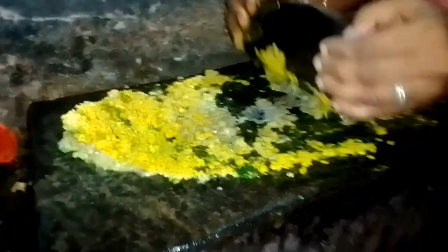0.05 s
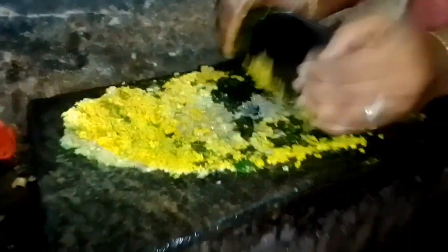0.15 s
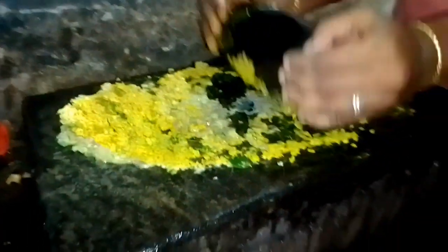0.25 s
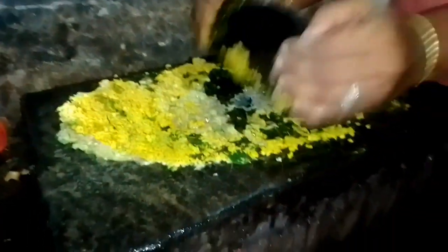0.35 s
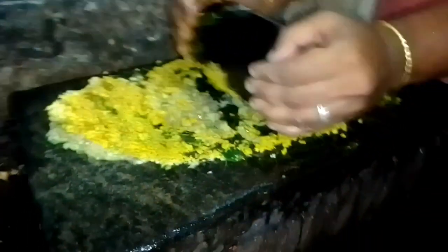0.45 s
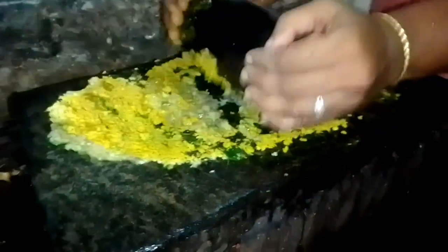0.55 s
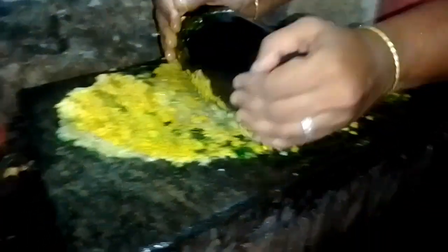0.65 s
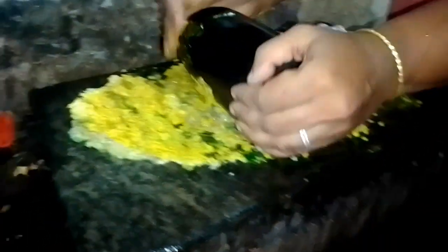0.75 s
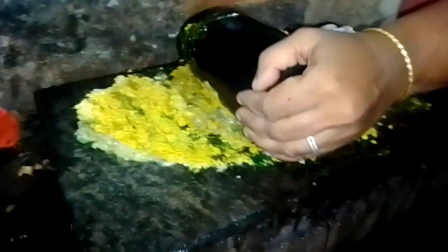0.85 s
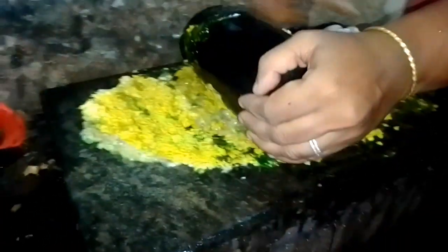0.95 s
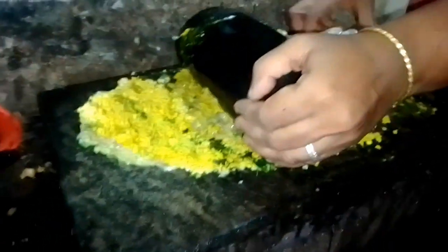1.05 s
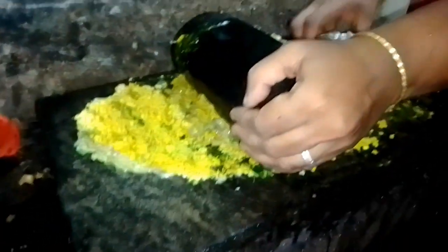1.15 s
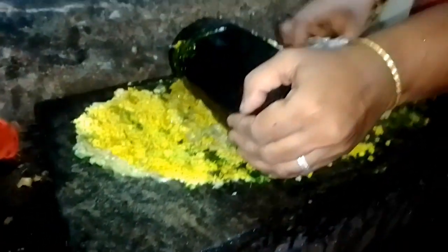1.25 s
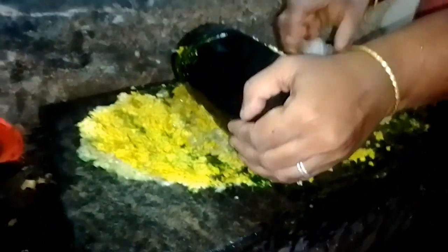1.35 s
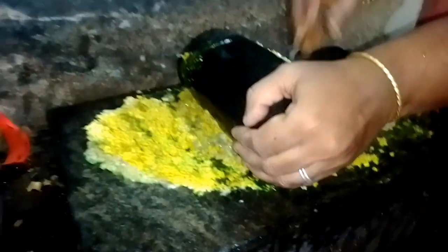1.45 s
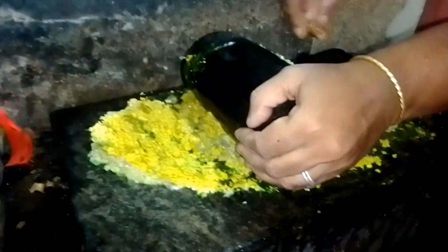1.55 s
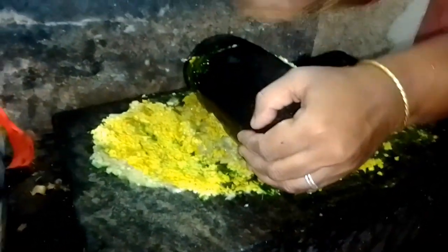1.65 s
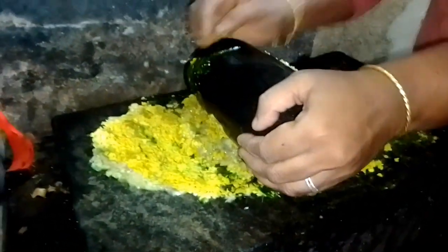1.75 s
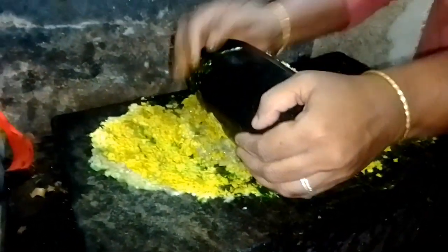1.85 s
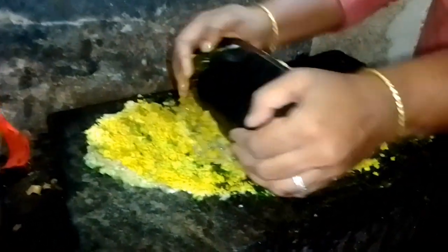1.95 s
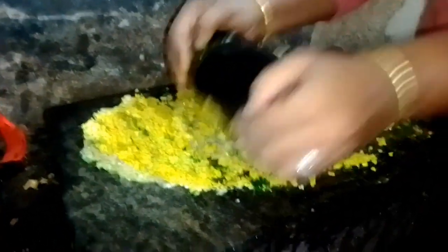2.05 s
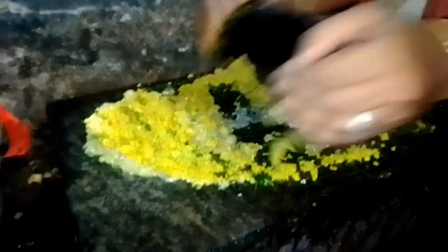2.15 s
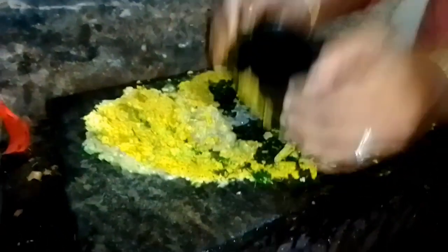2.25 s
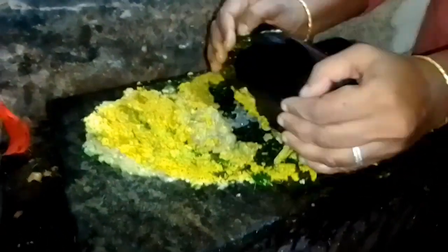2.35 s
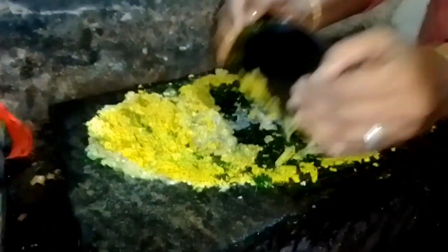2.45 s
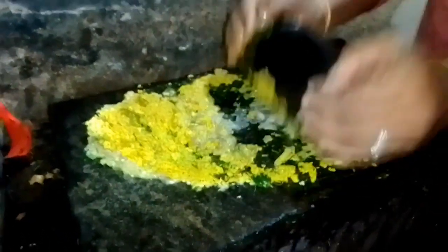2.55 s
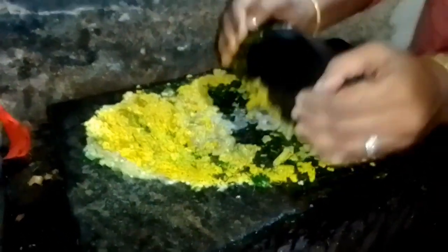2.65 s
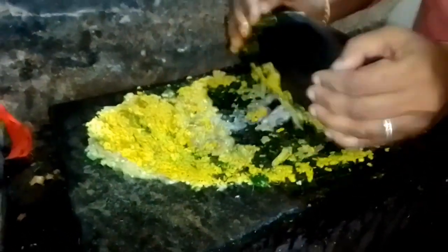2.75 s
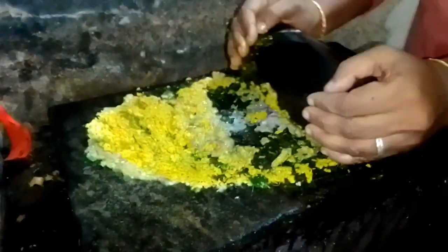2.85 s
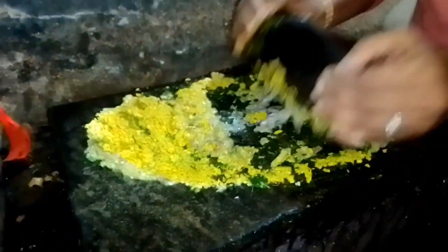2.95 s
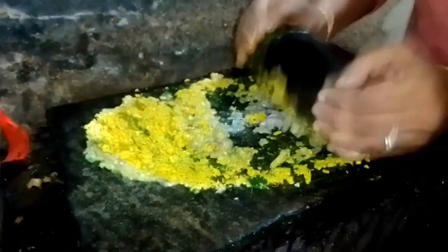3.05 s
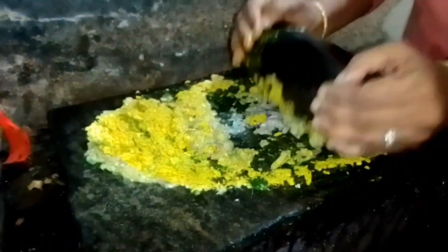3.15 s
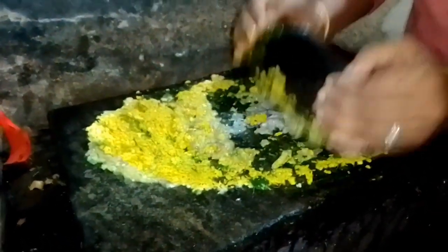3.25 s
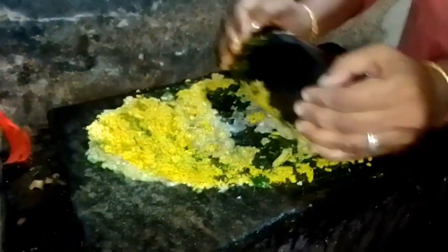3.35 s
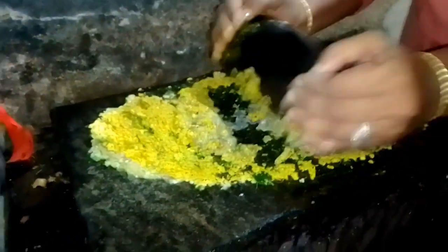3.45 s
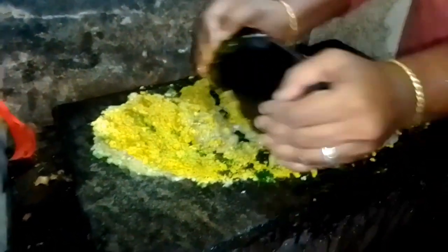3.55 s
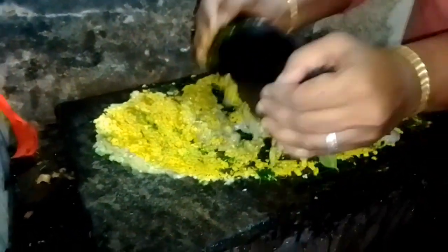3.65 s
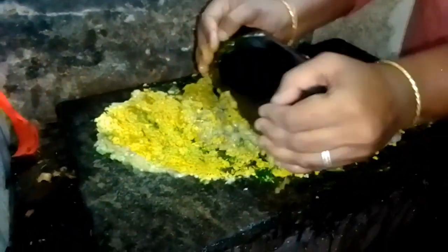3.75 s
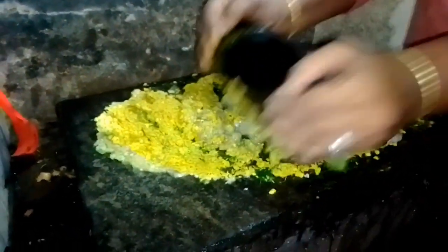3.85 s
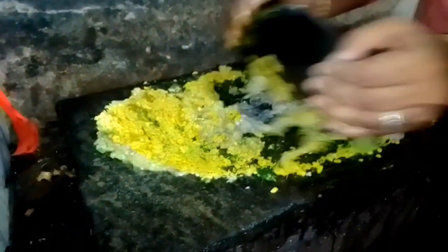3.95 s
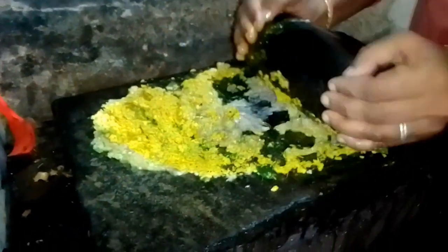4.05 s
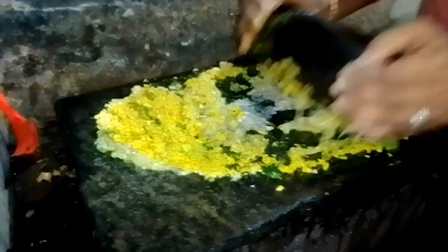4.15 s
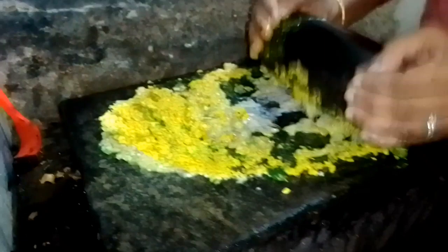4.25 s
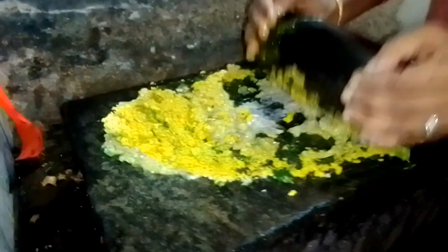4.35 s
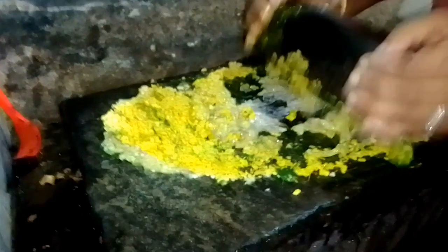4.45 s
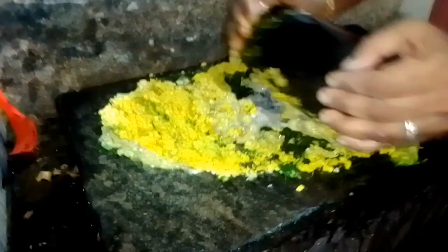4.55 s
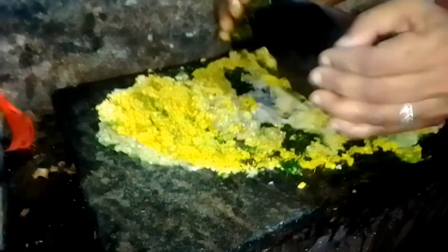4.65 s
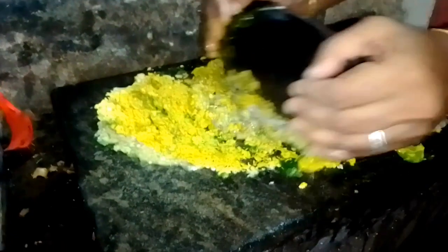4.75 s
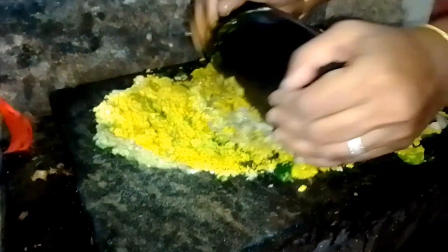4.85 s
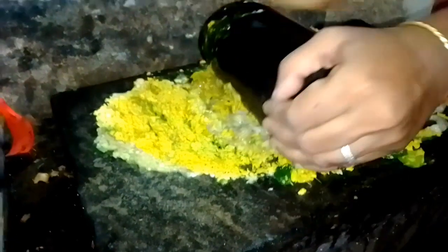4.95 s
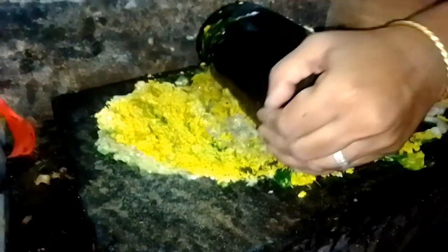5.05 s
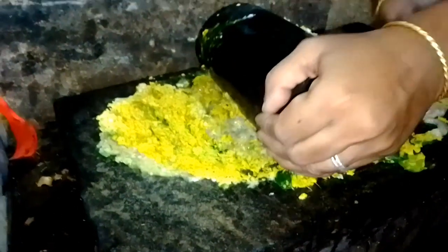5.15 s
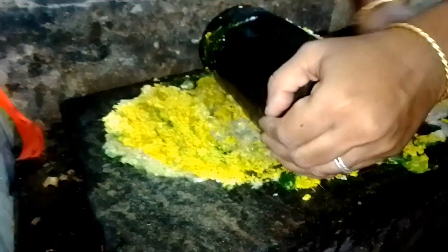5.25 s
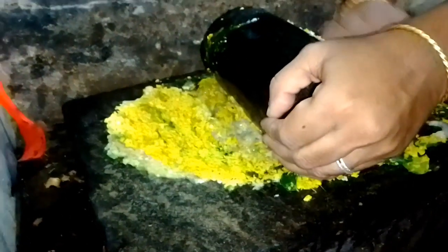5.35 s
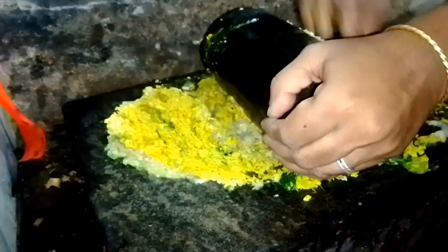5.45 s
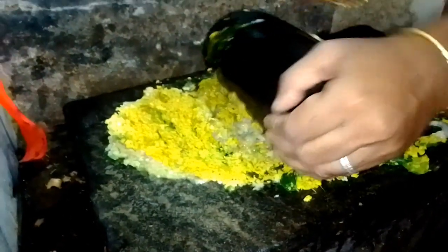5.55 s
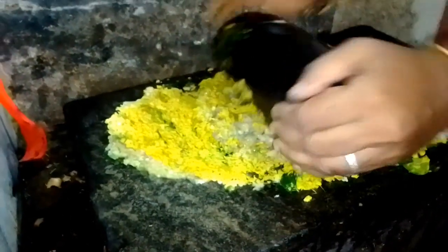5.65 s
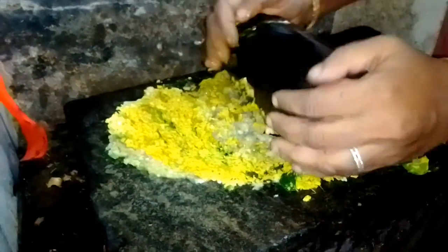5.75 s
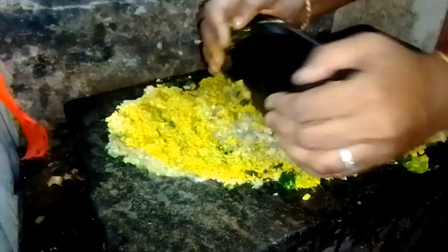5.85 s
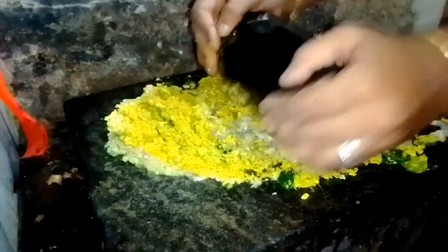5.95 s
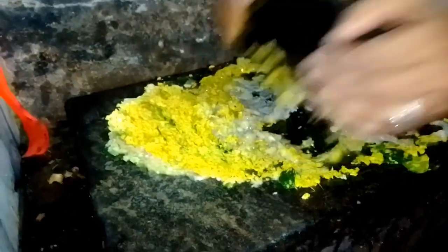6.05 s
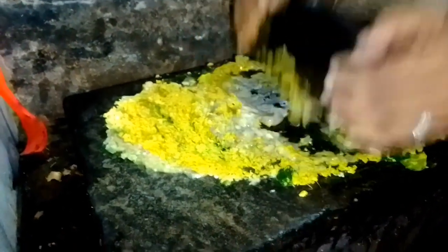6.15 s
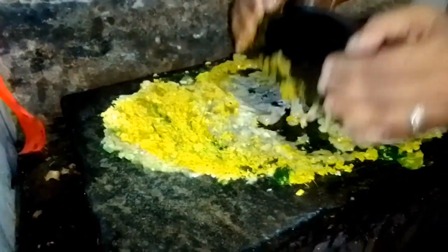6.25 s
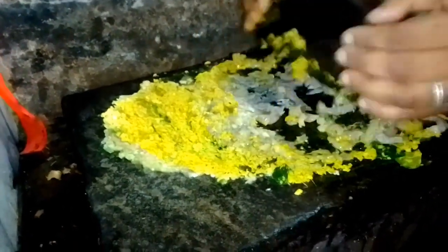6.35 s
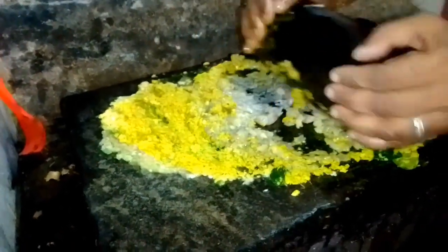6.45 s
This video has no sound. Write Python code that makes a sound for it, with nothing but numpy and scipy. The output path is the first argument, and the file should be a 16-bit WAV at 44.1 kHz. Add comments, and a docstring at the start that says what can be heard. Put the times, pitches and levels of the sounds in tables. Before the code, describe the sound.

Close up in a small hard-walled kitchen, a stone roller works wet, grainy paste on a flat slab. Soft smacks and thin squeaks come first, then quiet gritty rubbing, then a quick run of wet smacks with squeals and a low groan. A sharp stone knock rings briefly near the end, followed by faint crackle. A faint hum and hiss stay behind.

```python
"""Wet spice paste smacks and squeaks under a stone roller worked by hand on a flat grinding stone in a small kitchen.
Smacks, pops and crunches are bursts of tiny clicks passed through filters; squeaks and groans are unsteady tones.
Grains crackle as filtered clicks and the slab rumbles as low noise, both following the weight on the roller.
Once stone knocks hard on stone: a few filtered blows and many fading tones.
Hard walls answer the paste and the knock's thud; a faint hum and hiss lie behind."""
import sys
import numpy as np
from scipy import signal
from scipy.fft import rfft, irfft
from scipy.io import wavfile

SR = 44100
rng = np.random.default_rng(int(sys.argv[2]) if len(sys.argv) > 2 else 0)


def inscribe(sig):
    """Save sig as 16-bit PCM at rate SR to the path in sys.argv[1].

    A 1-D sig is mono; a 2-D sig holds one channel per row.
    Samples are clipped to [-1, 1] before scaling.
    """
    pcm = np.round(np.clip(np.atleast_2d(sig).T, -1, 1) * 32767)
    wavfile.write(sys.argv[1], SR, pcm.astype(np.int16))


N = 286209
TIME = np.arange(N) / SR  # seconds

# Wet smacks of the paste: (time [s], strength [dB], air pocket's snap against strength [dB],
# fizz against strength [dB], air pocket's pitch [Hz])
SMACK_EVENTS = [(0.3314, -53, 9.5, -7, 1990), (0.56, -53.5, 11, -13.5, 1830), (2.452, -51.5, 1, -18, 2025),
                (2.702, -48.5, -1, -20, 1530), (2.946, -47, 2, -19, 2140), (3.196, -47.5, 6, -16.5, 1960),
                (3.416, -42.5, 0, -19.5, 1940), (3.639, -58, 7, -11.5, 1980),
                (3.874, -44.5, -4.5, -18, 2270), (4.169, -47, 4.5, -22, 2050),
                (4.3917, -47.5, -0.5, -14.5, 1910), (4.868, -57.5, 8.5, -17, 1500)]
# Thin squeals as wet paste is squeezed out: (time [s], length [s], starting pitch [Hz], level before fading [dB])
SQUEAL_EVENTS = [(0.096, 0.088, 2597, -61), (.325, 0.18, 2087, -47.5), (1.058, 0.1, 1690, -59),
                 (2.71, 0.11, 1620, -50), (2.775, 0.11, 1700, -48.5), (2.967, 0.078, 1450, -54.5),
                 (3.2, 0.152, 2017, -52.5), (3.428, 0.118, 2794, -52.5)]
# Longer squeaks, a narrow tone with a hoarse one above: (time [s], length [s], starting pitch of the
# narrow tone [Hz], its level before fading [dB])
SQUEAK_EVENTS = [(0.452, 0.24, 1940, -57), (1.312, .24, 1846, -59), (2.268, 0.15, 2158, -62.5),
                 (3.382, .19, 2010, -56.5), (5.356, 0.227, 1835, -58.5)]
# The loudest seeds and bubbles popping: (time [s], relative level [dB], pitch [Hz])
POP_EVENTS = [(0.0924, -30, 2480), (0.1275, -36, 2510), (0.4975, -51, 1840), (1.0675, -50, 1580),
              (1.0853, -46, 1550), (1.2348, -53, 1620), (1.9725, -48.5, 1660), (2.2987, -42, 2130),
              (2.7882, -41.5, 1620), (3.244, -39.5, 1670), (4.0385, -53, 1660), (6.0031, -47, 1480)]
# Soft crunches of grains giving way: (time [s], level [dB], swell [s])
CRUNCH_EVENTS = [(0.779, -48.5, 0.017), (0.964, -64, 0.022), (1.315, -58.5, 0.022), (2.29, -61, 0.04),
                 (3.769, -61.5, 0.03), (4.479, -59, 0.025), (4.924, -63, 0.012), (6.0, -61.5, 0.03),
                 (6.305, -49, 0.023)]
# Weight on the roller, as a relative loudness: (time [s], level [dB])
ROLLER_EFFORT = [(0.0, -76.5), (0.89, -66.5), (1.05, -63.5), (1.23, -72), (2.13, -77.5), (2.76, -69),
                 (3.34, -66), (3.6, -65), (3.92, -68), (4.47, -64), (4.83, -58), (5.17, -74), (5.46, -76.5),
                 (5.87, -73), (6.42, -66.5), (6.49, -68)]
# The slab groans under the roller: (time [s], length [s], pitch [Hz], level [dB])
GROAN_EVENTS = [(1.481, 0.2, 422, -70), (3.079, 0.46, 320, -55.5), (3.728, 0.42, 299, -66),
                (6.144, 0.76, 296, -64.5), (6.41, 0.2, 388, -62)]
# Stone on stone, a blow and its rebounds: (time [s], relative level [dB])
KNOCK_BLOWS = [(4.6354, 9.5), (4.6420, -0.5), (4.6500, -12), (4.6595, -9.5), (4.6744, 1.5)]
# Tones that slab and roller ring with: (pitch [Hz], relative level [dB], time to fall by 60 dB [s])
STONE_TONES = [(108, -32, .4), (215, -3, .3), (248, -5, .35), (309, -1, .4), (389, -5, .3), (486, -6, .3),
               (520, -8, .2), (571, -10, .36), (608, -11, .3), (673, -8, .26), (794, -7, .22),
               (923, -4, .24), (1045, -3, .29), (1131, -2, .3), (1162, -3, .28), (1222, -10, .33),
               (1290, -9, .35), (1339, -7, .33), (1425, -6, .32), (1461, -3, .26), (1547, -6, .3),
               (1577, -5, .26), (1669, -10, .3), (1725, -9, .28), (1788, -6, .25), (1884, -6, .18),
               (2008, -11, .28), (2110, -15, .27), (2385, -16, .23)]

# Tone colours of the paste, each: (frequency [Hz], relative level [dB])
SNAP_SPECTRUM = [(300, -52), (900, -19), (1400, -2.5), (2000, 7), (2700, -12.5), (3500, -45), (7000, -37)]
SPIT_SPECTRUM = [(1200, -37), (2400, -7.5), (3100, 1), (3800, -0.5), (5000, -9.5), (6500, -22),
                 (12000, -58)]
FIZZ_SPECTRUM = [(3000, -44), (6000, -3.5), (8500, 1), (12000, -10), (15000, -13)]
BODY_SPECTRUM = [(60, -58), (140, -14), (220, 4), (330, -7), (430, -9), (650, 1.5), (1100, -3.5),
                 (1600, -33), (4000, -28)]
SQUELCH_SPECTRUM = [(120, -44), (230, -8), (450, -31), (700, -0.5), (1000, -1), (1500, 5.5), (2100, 1.5),
                    (2800, 2), (4000, -24), (6000, -26.5), (14000, -36)]
POP_SPECTRUM = [(150, -35), (500, -9), (1000, -4), (1600, 0), (2600, -3), (4500, -15), (7000, -25),
                (15000, -36)]
CRUNCH_SPECTRUM = [(200, -26), (900, -7), (1700, 3), (2600, -4), (3600, -5.5), (5500, -14), (7000, -21),
                   (15000, -34)]
# Tone colours of the rubbing, slab, knock and background, each: (frequency [Hz], relative level [dB])
GRIT_SPECTRUM = [(150, -27), (500, 1), (1000, 2), (1600, 5), (2600, -1.5), (4500, -26), (7000, -30),
                 (15000, -35)]
RUMBLE_SPECTRUM = [(40, -55), (80, -40), (110, -29), (165, -33), (200, -13), (250, -12), (295, -3),
                   (340, 0), (420, -20), (800, -30), (3000, -60)]
CRUSH_SPECTRUM = [(200, -18), (1000, -2), (2700, -4), (3800, 0), (6200, -14), (9000, -14), (15000, -24)]
KNOCK_SPECTRUM = [(40, -57), (100, -28), (155, -26), (210, -3.5), (340, 7), (430, -1.5), (520, 2.5),
                  (800, 0), (1600, 3.5), (2400, -10.5), (2900, -27), (3900, -22), (6200, -67), (15000, -58)]
AIR_SPECTRUM = [(10, 19), (60, -5.5), (200, -10.5), (350, 6), (500, 7), (1600, -6.5), (3000, -1.5),
                (6000, -13), (15000, -14.5)]
# Kitchen reverberation: (frequency [Hz], time to fall by 60 dB [s])
ROOM_DECAY = [(150, 0.32), (400, 0.41), (1500, 0.32), (3000, 0.33), (6000, 0.17), (14000, 0.49)]

PRESS_LEAD_S, PRESS_DB = 0.012, -14.5  # paste starts to tear just before it smacks; level against strength
# Sag is the share of pitch lost over the length; fade is the dB lost over it.
SQUEAL_SAG, SQUEAL_WIDTH_HZ, SQUEAL_FADE_DB = 0.081, 200, 18
SQUEAK_SAG, SQUEAK_WIDTH_HZ, SQUEAK_FADE_DB = 0.0396, 120, 8
UPPER_HZ, UPPER_WIDTH_HZ, UPPER_DB = 4080, 510, -12  # hoarse tone, starting pitch; level against the narrow one
GRIT_DB, GRIT_PER_EFFORT = -66, 0.26  # rubbing at full effort; dB lost for each dB less effort
SEEDS_PER_S, SEED_HZ, SEED_DB = 14, 1670, -13  # lesser pops, on average; level against the crackle
HUM_HZ, HUM_DB = 344.5, -67.5  # middle values, both waver
TOP_HZ = 15600  # highest frequency let through


def smacks(level_db=-1, body_db=-14, squelch_db=-3.0, lead_s=.0025, snap_s=0.0043, spit_s=0.0044,
           fizz_s=0.0045, squelch_s=0.022, delay_s=.007):
    """Paste tears, spits, snaps an air pocket, thumps the slab and squelches out, all growing with strength."""
    out, t = np.zeros(N), TIME[:SR // 6]
    for s, strength, snap_db, fizz_db, pocket_hz in SMACK_EVENTS:
        pocket = bump(pocket_hz, width_hz=90, db=9.5)
        snap = colour(burst(snap_s), SNAP_SPECTRUM, pocket)
        spit = colour(burst(spit_s), SPIT_SPECTRUM)
        fizz = colour(burst(fizz_s), FIZZ_SPECTRUM)
        body = colour(burst(snap_s), BODY_SPECTRUM)
        parts = [(snap, snap_db), (spit, 0), (fizz, fizz_db), (body, body_db)]
        smack = sum(packet(part, strength + db, .02) for part, db in parts)

        clicks = grains(len(t), rate=5000, spread_db=4.5)
        ooze = clicks * np.exp(-t / squelch_s) * amp(2 * walk(99, len(t)))
        ooze = packet(colour(ooze, SQUELCH_SPECTRUM, pocket), strength, .05)
        press = packet(colour(burst(PRESS_LEAD_S), CRUNCH_SPECTRUM), strength + PRESS_DB, .02)

        add(out, s - PRESS_LEAD_S, press)
        add(out, s - lead_s, amp(level_db) * smack)
        add(out, s + delay_s, amp(squelch_db) * ooze)
    return out


def squeaks():
    """Rubbing makes short single squeals and longer two-tone squeaks, each sinking in pitch as it fades."""
    out = np.zeros(N)
    for s, length, hz, db in SQUEAL_EVENTS:
        squeal = rub(length, hz, db, SQUEAL_WIDTH_HZ, steady=0.46, sag=SQUEAL_SAG, fade_db=SQUEAL_FADE_DB)
        add(out, s, squeal)
    for s, length, hz, db in SQUEAK_EVENTS:
        sinking = dict(sag=SQUEAK_SAG, fade_db=SQUEAK_FADE_DB)
        narrow = rub(length, hz, db, SQUEAK_WIDTH_HZ, steady=0.77, **sinking)
        hoarse = rub(length, UPPER_HZ, db + UPPER_DB, UPPER_WIDTH_HZ, steady=.3, **sinking)
        add(out, s, narrow)
        add(out, s, hoarse)
    return out


def pops(level_db=-10.5, snap_s=0.0014, lead_s=.0005):
    """Seeds and bubbles pop as tiny bursts, each with a short pitched ring."""
    out = np.zeros(N)
    for s, db, hz in POP_EVENTS:
        ring = bump(hz, width_hz=200, db=17)
        pop = packet(colour(burst(snap_s, rate=15000), POP_SPECTRUM, ring), db, .01)
        add(out, s - lead_s, amp(level_db) * pop)
    return out


def crunches():
    """Clumps of grains break slowly under the weight."""
    out = np.zeros(N)
    for s, db, swell_s in CRUNCH_EVENTS:
        crunch = colour(burst(swell_s, rate=2900), CRUNCH_SPECTRUM)
        add(out, s, packet(crunch, db, 0.0091))
    return out


def rolling(rumble_db=4.5, patchy_db=-0.2):
    """The rough roller shakes the slab, cracks grains and pops odd seeds, all louder with more weight on it."""
    s, db = np.transpose(ROLLER_EFFORT)
    effort = np.interp(TIME, s, db)
    rumble = unit(colour(rng.standard_normal(N), RUMBLE_SPECTRUM)) * amp(effort + rumble_db)

    cracks = colour(grains(N, rate=1500, spread_db=5.5), GRIT_SPECTRUM)
    crackle = unit(cracks * amp(2.8 * walk(50)))
    seed_ring = bump(SEED_HZ, width_hz=260, db=13.5)
    seeds = unit(colour(grains(N, SEEDS_PER_S, spread_db=3), POP_SPECTRUM, seed_ring))
    rubbing_db = GRIT_DB + GRIT_PER_EFFORT * (effort - db.max()) + patchy_db * walk(12)
    return rumble, (crackle + amp(SEED_DB) * seeds) * amp(rubbing_db)


def groans(width_hz=9):
    """The slab gives low, nearly pure tones under the roller."""
    out = np.zeros(N)
    for s, length, hz, db in GROAN_EVENTS:
        add(out, s, rub(length, hz, db, width_hz, steady=4))
    return out


def knock(thud_db=-21.0, ring_db=-28.5, crush_db=-33, crush_s=4.6312):
    """The roller crushes through the paste, strikes the slab and chatters; returns crush, thud and ringing."""
    t = TIME[:SR]
    crush, blows, ring = np.zeros((3, N))
    add(crush, crush_s, packet(colour(burst(.0022), CRUSH_SPECTRUM), crush_db, .005))
    for s, db in KNOCK_BLOWS:
        add(blows, s, amp([db]))
    thud = packet(colour(blows, KNOCK_SPECTRUM), thud_db, .01)

    tones = np.zeros(len(t))
    for hz, db, t60 in STONE_TONES:
        decay = np.exp(-np.log(1000) * t / t60)
        tones += amp(db) * decay * np.sin(2 * np.pi * (hz * t + rng.random()))
    soft_start = (1 - np.exp(-t / 0.0023)) ** 2
    add(ring, KNOCK_BLOWS[0][0], amp(ring_db) * tones * soft_start)
    return crush, thud, ring


def background(air_db=-72.5):
    """A hum wavering slightly in pitch and level lies over soft filtered noise."""
    tone = np.sin(2 * np.pi * np.cumsum(HUM_HZ + walk(15)) / SR)
    hum = unit(tone) * amp(HUM_DB + walk(3.14))
    return hum + amp(air_db) * unit(colour(rng.standard_normal(N), AIR_SPECTRUM))


def kitchen(x, wet_db, gap_s=0.0017, dull_hz=6000):
    """Close hard walls add a dense tail of noise, softer in the treble; each octave dies at its own rate."""
    t = TIME[:2 * SR // 3]
    hiss = rfft(rng.standard_normal(len(t)))
    hz = np.arange(len(hiss)) * SR / len(t)
    octave = np.round(np.log2(np.maximum(hz, 64)))
    tail = np.zeros(len(t))
    for k in np.unique(octave):
        band = irfft(hiss * (octave == k) / np.hypot(1, hz / dull_hz), len(t))
        tail += band * np.exp(-np.log(1000) * t / at_hz(ROOM_DECAY, 2 ** k))
    tail = tail * (t > gap_s)  # silence before the first echo
    tail = tail / np.sqrt(np.sum(tail ** 2))
    return x + amp(wet_db) * signal.fftconvolve(x, tail)[:N]


def rub(length, hz, db, width_hz, steady, sag=0, fade_db=0, rise=0.21, fall=0.43):
    """A rubbing tone, unsteady in size and pitch, sags and fades; rise and fall are shares of the length."""
    t = TIME[:SR // 2]
    along = np.minimum(t / length, 1)
    phase = 2 * np.pi * np.cumsum(hz * (1 - sag * along)) / SR
    # a steady part plus random sway makes the tone flutter
    flutter = steady + walk(2 * width_hz, len(t)) + 1j * walk(2 * width_hz, len(t))
    ramp = np.minimum(along / rise, (1 - along) / fall)
    gate = np.sin(np.pi / 2 * np.minimum(ramp, 1)) ** 2
    tone = np.real(flutter * np.exp(1j * phase)) * gate
    return packet(tone, db, length) * amp(-fade_db * along)


def burst(length, rate=9000):
    """A film of paste tears in a quick swell of tiny snaps, strongest after the given length in seconds."""
    t = TIME[:SR // 6]
    swell = t / length * np.exp(1 - t / length)
    return grains(len(t), rate, spread_db=-2.0) * swell ** 2


def grains(size, rate, spread_db):
    """Random clicks of uneven strength, on average rate a second."""
    clicks = (rng.random(size) < rate / SR) * rng.choice([-1, 1], size)
    return clicks * amp(spread_db * np.clip(rng.standard_normal(size), -2, 2))


def walk(rate, size=N):
    """Random drift of spread near 1, heading for a new value rate times a second."""
    values = rng.standard_normal(size)
    return np.sqrt(3 / 2) * np.interp(TIME[:size] * rate, np.arange(size), values)


def colour(x, points, shade=lambda hz: 0, size=8192):
    """Filter without pre-echo to the given spectrum, plus an optional shading in dB."""
    hz = np.arange(size // 2 + 1) * SR / size
    # folding the cepstrum puts the filter's energy as early as possible
    cepstrum = irfft(np.log(amp(at_hz(points, hz) + shade(hz))))
    cepstrum[1:size // 2] *= 2
    cepstrum[size // 2 + 1:] = 0
    response = irfft(np.exp(rfft(cepstrum)))
    return signal.oaconvolve(x, response)[:len(x)]


def bump(hz, width_hz, db):
    """Shading of one resonance, in dB."""
    return lambda f: db / (1 + ((f - hz) / width_hz) ** 2)


def at_hz(points, hz):
    """Read a table's value at a frequency, on a log-frequency axis."""
    f, value = np.transpose(points)
    return np.interp(np.log(np.maximum(hz, 1)), np.log(f), value)


def packet(x, db, seconds):
    """Scale a short sound to the energy of a level held for some seconds."""
    return x * amp(db) * np.sqrt(seconds * SR / (np.sum(x ** 2) + 1e-18))


def unit(x):
    """Scale to an average (rms) level of 1."""
    return x / np.sqrt(np.mean(x ** 2))


def amp(db):
    """Decibels to gain."""
    return 10 ** (np.asarray(db) / 20)


def add(out, s, x):
    """Mix x into out at time s in seconds."""
    start = max(int(s * SR), 0)
    out[start:start + len(x)] += x[:max(N - start, 0)]


def scene():
    """Paste, stone and room together."""
    crush, thud, ring = knock()
    rumble, grit = rolling()
    paste = smacks() + squeaks() + pops() + crunches() + grit + crush
    slab = rumble + groans() + ring
    near = kitchen(paste, wet_db=-9)
    # the broad slab sends more of its thud to the walls than the paste does
    struck = kitchen(thud, wet_db=-2.5)
    return (near + struck + slab + background())[None]


def record(dry):
    """The recorder cuts the top with a steep low-pass filter."""
    low_pass = signal.ellip(10, .2, 70, TOP_HZ, fs=SR, output="sos")
    return signal.sosfilt(low_pass, dry)


dry = scene()
out = record(dry)
inscribe(out)
```